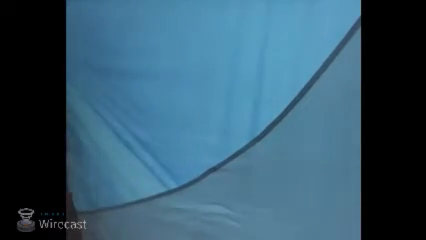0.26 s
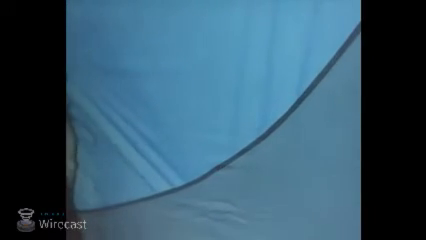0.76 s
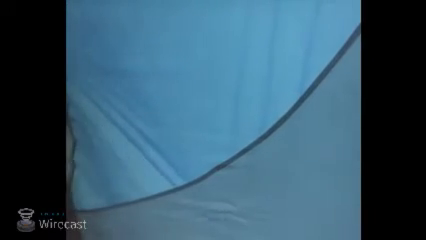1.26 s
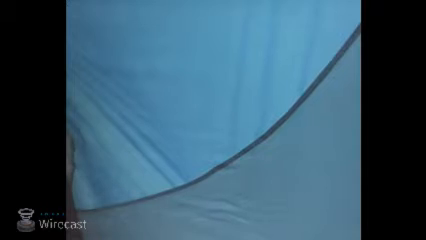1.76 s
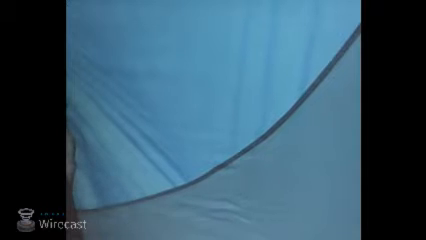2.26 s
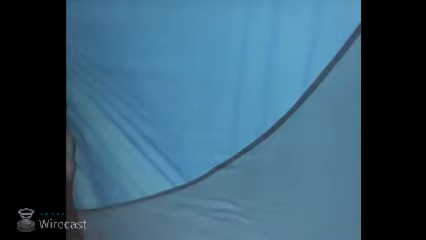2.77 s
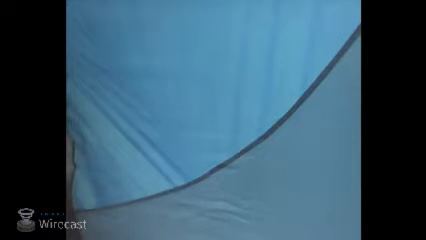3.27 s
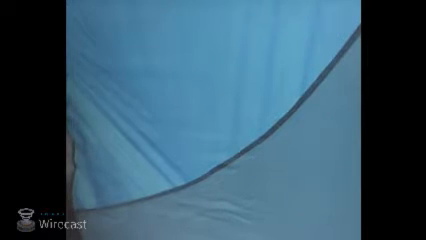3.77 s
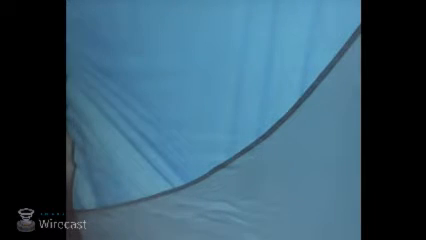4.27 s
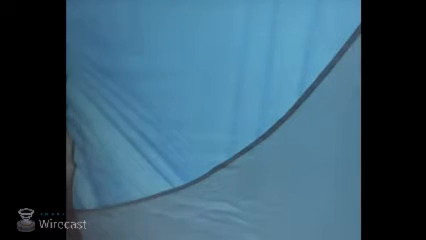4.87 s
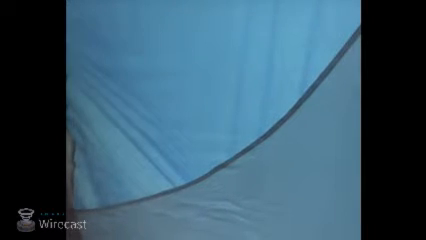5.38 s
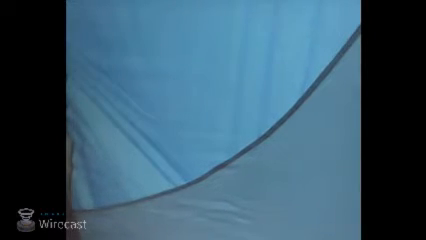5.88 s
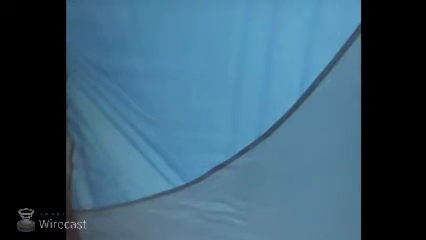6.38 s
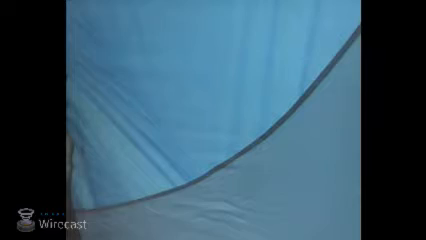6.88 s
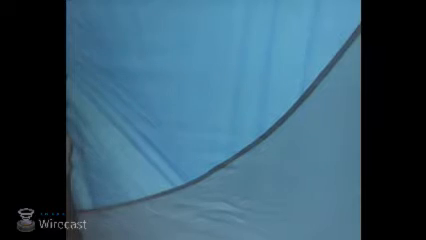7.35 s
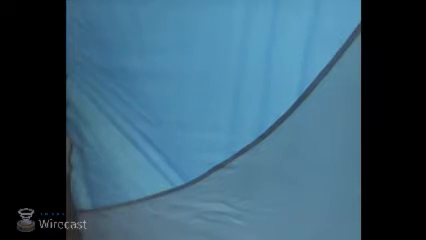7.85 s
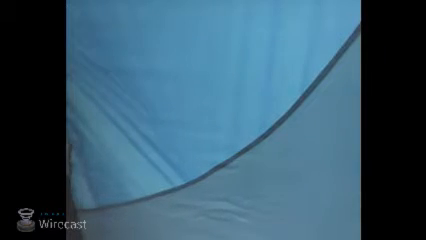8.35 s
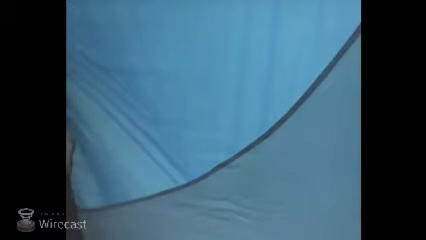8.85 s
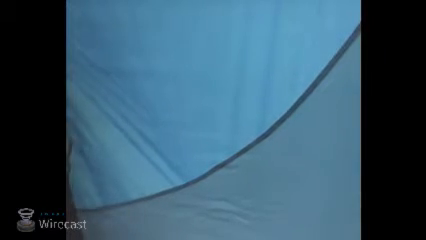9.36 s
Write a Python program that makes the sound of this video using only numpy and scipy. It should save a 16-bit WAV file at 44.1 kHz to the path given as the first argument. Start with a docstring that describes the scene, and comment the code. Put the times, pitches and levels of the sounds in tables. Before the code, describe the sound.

A dense, hissing summer cicada chorus grows into a bright pulsing shrill, while tent fabric rustles and a held microphone is softly bumped.

```python
"""Cicadas shrill in the trees around a tent on a summer day; a far chorus, open air and a drone never stop.
At the start the tent cloth rustles and a hand-held camera gets soft knocks; both come back later.
From about 1 s a nearer group rasps in short surges and swells, and a thin whistle comes and goes.
All the while two near cicadas wind up, ever higher and louder; near 7.6 s there is a hollow double knock.
Insects are uneven clicks made to ring or coloured; cloth and air are coloured noise; knocks are fading tones."""
import sys
import numpy as np
from scipy import signal
from scipy.fft import rfft, irfft, next_fast_len
from scipy.io import wavfile

SR = 44100
rng = np.random.default_rng(int(sys.argv[2]) if len(sys.argv) > 2 else 0)


def dump(signal):
    """Clip the signal to [-1, 1] and save it as 16-bit WAV at the path in sys.argv[1]."""
    limited = np.clip(np.atleast_2d(signal).T, -1, 1)
    pcm = np.round(limited * 32767).astype(np.int16)
    wavfile.write(sys.argv[1], SR, pcm)


N = 424241
TIME = np.arange(N) / SR


def amp(db):
    """Turns decibels into a plain multiplier."""
    return 10 ** (np.asarray(db) / 20)


def evened(x):
    """Scales a sound to an average strength (rms) of 1."""
    return x / np.sqrt(np.mean(x ** 2) + 1e-20)


def curves(rows):
    """Draws each column of a table as a curve over the whole time."""
    t, *columns = np.transpose(rows)
    return [np.interp(TIME, t, column) for column in columns]


def add(mix, start_s, sound):
    """Mixes in a sound that starts at start_s seconds."""
    part = mix[max(round(start_s * SR), 0):][:len(sound)]
    part += sound[:len(part)]


def coloured(x, spectrum):
    """Filters x by a spectrum table, read on a log pitch scale, and evens it to rms 1."""
    size = next_fast_len(N)
    hz, db = np.transpose(spectrum)
    bins = np.fft.rfftfreq(size, 1 / SR)
    gain = amp(np.interp(np.log(bins + 1), np.log(hz), db))
    return evened(irfft(rfft(x, size) * gain, size)[:N])


def noise(spectrum):
    """Makes steady noise of a given colour, at rms 1."""
    return coloured(rng.standard_normal(N), spectrum)


def wander(per_s):
    """Drifts between random points, per_s of them a second, at rms 1."""
    knots = rng.standard_normal(4096)
    return evened(np.interp(TIME * per_s, np.arange(len(knots)), knots))


def resonate(x, hz, width):
    """Rings x in a steep resonance, width in Hz, that follows the pitch curve hz; rms 1."""
    turn = np.exp(2j * np.pi * np.cumsum(hz) / SR)
    r = np.exp(-np.pi * width / SR)
    # shift the pitch down to zero, smooth there, then shift back up
    smooth = signal.lfilter([1], [1, -2 * r, r * r], x / turn)
    return evened((turn * smooth).real)


def clicks(click_hz, jitter, uneven_db):
    """A tymbal (a ribbed drum skin) buckles at a nearly steady rate, each click of its own size."""
    turns = np.cumsum(click_hz * (1 + jitter * wander(40))) / SR
    return np.diff(np.floor(turns), prepend=0) * amp(uneven_db * rng.standard_normal(N))


def trees(x, wet_db, t60, count=6):
    """Swaying leaves scatter a sound: its short tail of echoes drifts from one pattern to the next."""
    t = TIME[:SR // 8]
    tails = rng.standard_normal((count, len(t))) * amp(-60 * t / t60)
    sway = count * wander(5)
    wet = np.zeros(N)
    for k, tail in enumerate(tails):
        away = (sway - k) % count - count / 2
        share = np.sqrt(np.maximum(1 - abs(away), 0))
        wet += signal.oaconvolve(x * share, tail / np.linalg.norm(tail))[:N]
    # wet_db sets the echoes against the direct sound
    return evened(amp(-wet_db) * x + wet)


def swarm(click_hz, throb_hz, throb_db, count):
    """Several cicadas click and throb, each at its own pace around the given rates."""
    out = np.zeros(N)
    for pace in np.linspace(.75, 1.25, count):
        throb_rate = throb_hz * pace * (1 + 0.1533 * wander(3))
        throb = np.sin(2 * np.pi * np.cumsum(throb_rate) / SR)
        out += clicks(click_hz * pace, jitter=.08, uneven_db=3) * amp(throb_db * throb)
    return evened(out - out.mean())


# colour of the far chorus: (f/Hz, relative level/dB)
CHORUS_COLOUR = [(3000, -33.5), (3600, -23.5), (4000, -10.5), (4400, -2), (4800, 3), (5500, 3),
                 (6200, -1.5), (6900, -7.5), (8000, -10), (9400, -14), (10600, -13.5), (12400, -14.5),
                 (14300, -9), (15700, -8.5)]
# its loudness: (t/s, level/dB)
CHORUS_LOUDNESS = [(0, -43.5), (1.5, -43.5), (3, -42.5), (5, -44), (7.3, -43), (9.6, -44)]


def chorus(hiss_db=1):
    """Far cicadas blur into a grainy hiss that flutters a little."""
    far_swarm = swarm(click_hz=230.86, throb_hz=11, throb_db=1.5, count=4)
    grain = trees(far_swarm, wet_db=1.5, t60=0.069)
    farthest = amp(hiss_db) * rng.standard_normal(N)
    level_db = curves(CHORUS_LOUDNESS)[0] + 0.56 * wander(25)
    return coloured(grain + farthest, CHORUS_COLOUR) * amp(level_db)


# colour of the nearer group, with its body tone and octave: (f/Hz, relative level/dB)
GROUP_COLOUR = [(3600, -33), (4400, -11), (4900, -4), (5400, -2), (5900, 1), (6400, -2), (7200, -15.5),
                (9300, -20.5), (10500, -9.5), (11400, -5.5), (12500, -7.5), (13500, -25), (15700, -51)]
# its loudness: (t/s, level/dB)
GROUP_LOUDNESS = [(0, -52.5), (1.2, -53.5), (2, -48.5), (2.6, -48), (4, -46), (5.5, -44), (7.3, -42.5),
                  (8.3, -43.5), (9.6, -44.5)]
# colour of the rasp in a surge: (f/Hz, relative level/dB)
RASP_COLOUR = [(3700, -29.5), (4400, -6), (4900, 4), (5400, 3), (5900, 3.5), (6500, -7), (7400, -42),
               (9300, -19.5), (10500, -6.5), (11400, -11), (12600, -20), (15700, -32)]
# short surges: (t/s at the crest, level/dB)
SURGE_CRESTS = [(.86, -44.5), (1.55, -45), (1.91, -49), (2.131, -45), (2.45, -45), (2.58, -41.5),
                (3.01, -45), (3.44, -46), (3.64, -47), (3.97, -44.5), (4.39, -45.5), (4.82, -43.5),
                (5.26, -38.5), (5.751, -43.5), (6.27, -43), (6.62, -48), (6.83, -48), (7.03, -45),
                (7.3, -46), (7.92, -40.5), (8.34, -44), (8.8, -43), (9.12, -44)]


def group(surge_s=0.026):
    """The nearer group swells; one of them rasps out in brief bell-shaped surges."""
    near_swarm = swarm(click_hz=259.5, throb_hz=18, throb_db=2.0, count=3)
    steady = trees(near_swarm, wet_db=6.0, t60=0.13)
    level_db = curves(GROUP_LOUDNESS)[0] + .5 * wander(12)
    rasp = trees(clicks(190, jitter=.12, uneven_db=1.5), wet_db=33, t60=0.084)
    surges = sum(amp(db) * np.exp(-.5 * ((TIME - t) / surge_s) ** 2) for t, db in SURGE_CRESTS)
    return coloured(steady, GROUP_COLOUR) * amp(level_db) + coloured(rasp, RASP_COLOUR) * surges


# how hard the two near cicadas sing: (t/s, effort, 1 = full song)
SONG_EFFORT = [(0, .02), (1.2, .09), (2, 0.21), (2.4, 0.38), (3.7, 0.43), (4.8, 0.71), (5.6, 0.81),
               (6.5, 0.96), (8, 1.02), (9.6, 1.09)]
# how a hollow abdomen sends out the sound: (f/Hz, relative level/dB)
ABDOMEN_COLOUR = [(3000, -32), (4300, 8.5), (5000, 1.5), (6000, 2), (6800, -4), (7600, -0.5), (9300, -6.5),
                  (11000, 1), (12200, -5), (12900, 1.5), (13500, 1.5), (14500, -1), (15700, 4)]
# shrill pitch at no effort and its climb to full song, both before each singer's tuning
SLACK_HZ, CLIMB_HZ = 10680, 3090
DOUBLING_DB = 6  # louder by this for each doubling of effort
IN_STEP_S = 6.062  # both abdomens are at the same point of the throb here


def soloist(pace, db, tuning, sweep=0.072, body_ratio=0.5, body_db=-3.0, body_throb=0.12,
            body_sweep=0.078, shrill_throb=0.79, shrill_width_hz=1900, body_width_hz=1600):
    """Clicks ring a shrill and a body tone near the octave below; the pumping abdomen sweeps both."""
    effort = curves(SONG_EFFORT)[0]
    throbs = np.cumsum(curves(pace)[0]) / SR
    pump = np.cos(2 * np.pi * (throbs - np.interp(IN_STEP_S, TIME, throbs)))
    # more effort means a higher pitch and a wider sweep
    pitch = tuning * (SLACK_HZ + CLIMB_HZ * effort)
    hz = pitch * (1 + sweep * np.sqrt(abs(effort)) * pump + 0.01 * wander(300))
    # two tymbals take turns, and their ribs add a finer rattle
    turns = clicks(390, jitter=.04, uneven_db=1)
    drive = turns + 0.54 * clicks(980, jitter=.03, uneven_db=2.0)
    drive = drive - drive.mean()
    # stretched, the abdomen favours the shrill; slack, the body tone
    shrill = resonate(drive, hz, width=shrill_width_hz) * evened(1 + shrill_throb * pump)
    body_hz = hz * body_ratio * (1 + body_sweep * pump)
    body = resonate(drive, body_hz, width=body_width_hz) * evened(1 - body_throb * pump)
    song_db = db + DOUBLING_DB * np.log2(np.maximum(effort, .001))
    voice = (shrill + amp(body_db) * body) * amp(song_db)
    # colouring evens the level, so the voice's own strength is put back
    return coloured(trees(voice, wet_db=-2, t60=0.051), ABDOMEN_COLOUR) * voice.std()


# the pumping pace of each near cicada: (t/s, throbs per second)
LEADER_THROBS = [(2, 18.54), (2.8, 18.33), (3.6, 16.06), (4.4, 17.35), (5.4, 18.11), (6.5, 17.31),
                 (7.2, 17.19), (7.8, 16.57), (9.6, 16.36)]
RIVAL_THROBS = [(2, 15.85), (3.6, 15.71), (5.2, 15.47), (6.5, 15.04), (8, 15.25), (9.6, 14.3)]


def near_pair():
    """A leader and a fainter rival pump at their own pace, so their throbs drift in and out of step."""
    leader = soloist(LEADER_THROBS, db=-45.5, tuning=0.972)
    rival = soloist(RIVAL_THROBS, db=-49.0, tuning=0.975)
    return leader + rival


# a thin whistle within the chorus: (t/s, f/Hz, level/dB)
WHISTLE_NOTE = [(0, 5730, -69), (2.2, 5880, -63), (2.7, 5930, -53), (4.3, 5880, -49.5), (5, 5910, -51),
                (6.2, 5990, -62), (7.2, 5920, -59), (7.8, 6050, -61), (9.6, 5970, -53.5)]


def whistle():
    """One insect with a sharply tuned body holds a thin, fuzzy note: noise through a narrow resonance."""
    hz, level_db = curves(WHISTLE_NOTE)
    return resonate(rng.standard_normal(N), hz, width=120) * amp(level_db + 2 * wander(18))


# colour of tent cloth sliding: (f/Hz, relative level/dB)
SLIDE_COLOUR = [(100, -11), (300, 1), (600, -2.5), (900, -2.5), (1300, 0.5), (2000, 0), (2700, -1),
                (4000, 1.5), (7000, -8), (10000, -2), (15000, -18.5)]
# colour of the dull flap of tugged cloth: (f/Hz, relative level/dB)
FLAP_COLOUR = [(20, -1.5), (40, 8), (120, -1.5), (250, -5), (420, -3.5), (900, -9.5), (1500, -14),
               (3000, -30)]
# strokes of the cloth: (t/s at the crest, rise t/s, fall t/s, slide level/dB, flap level/dB)
CLOTH_STROKES = [(.03, .1, 0.18, -57.5, -53.5), (.45, 0.25, 0.21, -67, -58),
                 (1.02, 0.32, 0.26, -52.5, -60.5), (1.3, .2, 0.66, -66.5, -69.5),
                 (2.98, .14, 0.24, -60, -77), (3.37, 0.26, .25, -58, -76), (3.78, 0.064, .06, -59, -78),
                 (7.2, 0.18, 0.48, -55.5, -73), (7.6, 0.28, 0.15, -52.5, -63.5),
                 (7.88, 0.37, 0.51, -64, -68), (8.83, 0.19, .17, -59, -66), (9.17, 0.15, .15, -68, -65.5)]
STROKE_ROUND = 1.06  # 1 = pointed crest, 2 = round
FLAP_REST_DB = -77  # the cloth never hangs quite still


def cloth():
    """Tent cloth slides in uneven strokes and flaps dully, as two noises that swell and fade together."""
    slide, flap = 0, amp(FLAP_REST_DB)
    for t, rise, fall, slide_db, flap_db in CLOTH_STROKES:
        # 10 dB down one rise before and one fall after the crest
        away = np.maximum((t - TIME) / rise, (TIME - t) / fall)
        swell_db = -10 * away ** STROKE_ROUND
        slide = np.maximum(slide, amp(slide_db + swell_db))
        flap = np.maximum(flap, amp(flap_db + swell_db))
    return (noise(SLIDE_COLOUR) * slide + noise(FLAP_COLOUR) * flap) * amp(1.66 * wander(70))


def ring(hz, t60, rise_s):
    """One struck tone starts softly and falls by 60 dB in t60 seconds."""
    t = TIME[:SR // 2]
    return np.sin(2 * np.pi * hz * t) * amp(-60 * t / t60) * (1 - np.exp(-t / rise_s))


# soft bumps on the camera body: (t/s, level/dB before the fade, f/Hz, time to fade 60 dB t/s)
BODY_BUMPS = [(.005, -42, 120, 0.084), (.028, -37, 83, 0.057), (.13, -45, 90, .08), (.38, -43, 95, 0.071),
              (4.691, -45, 67.6, 0.19), (5.27, -54, 60, .15), (6.38, -50, 55.3, 0.16),
              (7.045, -47.5, 48.6, 0.38), (7.715, -45, 70, 0.06), (9.141, -42, 65.7, 0.089),
              (9.164, -45, 131, 0.074), (9.3, -46, 55, 0.11), (9.55, -51, 49.4, 0.18)]
# a hollow double knock: (t/s, level/dB)
DOUBLE_KNOCK = [(7.627, -42.5), (7.64, -45.5)]
# the tones in each knock: (f/Hz, level/dB added to the knock's, time to fade 60 dB t/s)
KNOCK_TONES = [(413, 3, 0.042), (564, -6, 0.036), (720, -4, 0.09), (876, -0.5, 0.042)]
# faint ticks: (t/s, level/dB before the fade, f/Hz, time to fade 60 dB t/s)
FAINT_TICKS = [(.467, -50, 990, 0.027), (2.491, -60, 1156, 0.096), (3.77, -61, 1244, 0.13),
               (4.996, -52, 1150, 0.035), (5.086, -54, 1300, .025), (5.4, -54, 1020, 0.039),
               (7.298, -48, 1630, 0.022), (9.165, -59, 690, .07)]


def handling(scuff=0.64):
    """Bumps of the hand and a hollow knock ring as fading tones; scuffing ticks add gritty noise."""
    out = np.zeros(N)
    for start, db, hz, t60 in BODY_BUMPS:
        add(out, start, amp(db) * ring(hz, t60, rise_s=0.0018))
    for start, db in DOUBLE_KNOCK:
        knock = sum(amp(tone_db) * ring(hz, t60, rise_s=0.0017) for hz, tone_db, t60 in KNOCK_TONES)
        add(out, start, amp(db) * knock)
    t = TIME[:SR // 2]
    for start, db, hz, t60 in FAINT_TICKS:
        grit = resonate(rng.standard_normal(len(t)), np.full(len(t), hz), width=4000)
        tone = 0.64 * ring(hz, t60, rise_s=0.00093)
        add(out, start, amp(db) * (tone + scuff * grit * amp(-60 * t / t60)))
    return out


# colour of the open air: (f/Hz, relative level/dB)
AIR_COLOUR = [(15, -32), (25, -5), (42, 5.5), (80, 1), (150, -2), (270, -11.5), (400, -12.5), (600, -22.5),
              (900, -24), (1300, -23), (1800, -18.5), (2350, -9), (3200, -13.5), (4500, -10.5), (8000, -48)]
# colour of a low drone far off: (f/Hz, relative level/dB)
DRONE_COLOUR = [(45, -13), (80, 0.5), (120, -7.5), (180, 1.5), (270, -4), (370, -18.5), (600, -28)]
# loudness of the drone: (t/s, level/dB)
DRONE_LOUDNESS = [(0, -66.5), (1.6, -69.5), (2.4, -64), (4, -64), (6.6, -65), (7.6, -67.5), (8.3, -70.5),
                  (9.6, -70.5)]


def surroundings(air_db=-62.5):
    """Low rumble and faint hiss of the open air, with a distant drone, both gently unsteady noise."""
    air = noise(AIR_COLOUR) * amp(air_db + 0.26 * wander(6.5))
    drone = noise(DRONE_COLOUR) * amp(curves(DRONE_LOUDNESS)[0] + 2.25 * wander(9.8))
    return air + drone


def scene():
    """Everything reaches one microphone, the same in both channels."""
    insects = chorus() + group() + near_pair() + whistle()
    mono = insects + cloth() + handling() + surroundings()
    return np.array([mono, mono])


def record(dry, edge_hz=15740):
    """The recorder's band limit: a steep filter takes away the treble above edge_hz."""
    low_pass = signal.firwin(801, edge_hz, window=("kaiser", 9), fs=SR)
    return signal.oaconvolve(dry, low_pass[None], "same")


dry = scene()
out = record(dry)
dump(out)
```